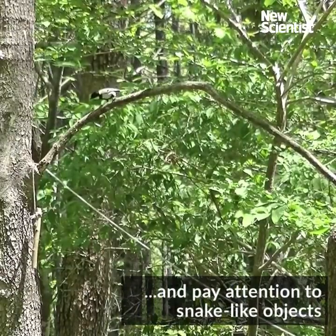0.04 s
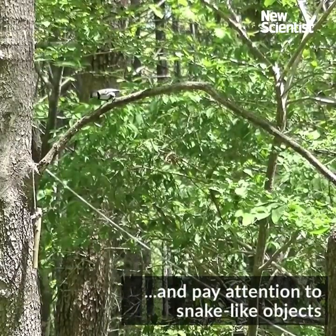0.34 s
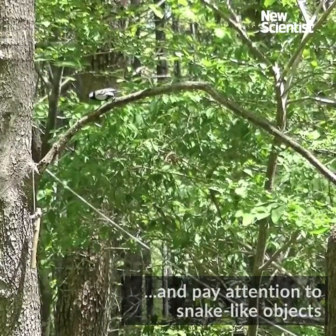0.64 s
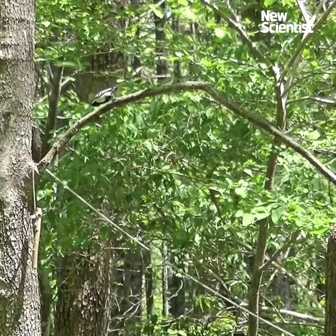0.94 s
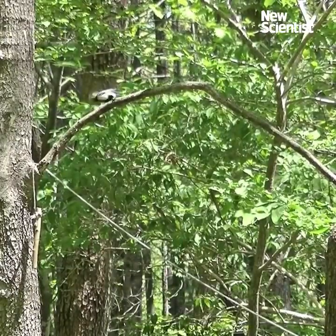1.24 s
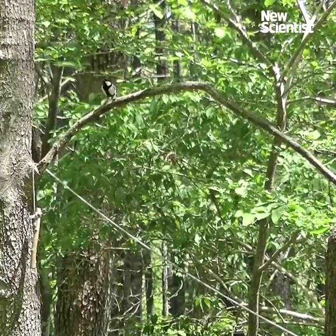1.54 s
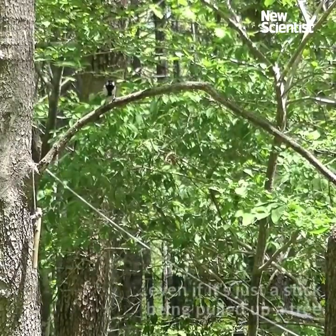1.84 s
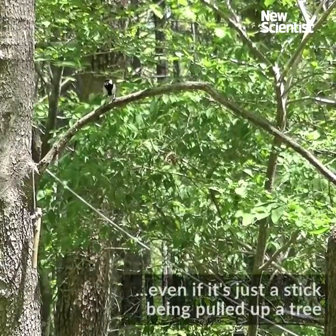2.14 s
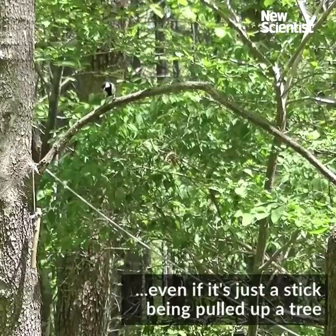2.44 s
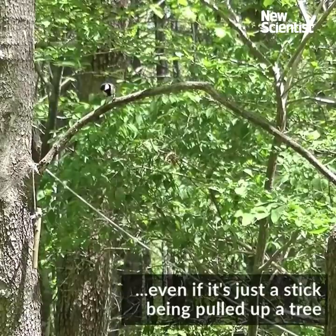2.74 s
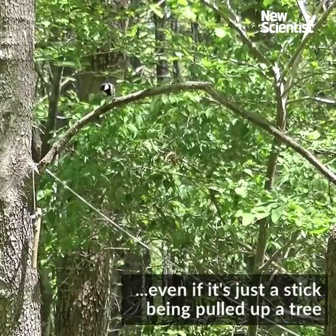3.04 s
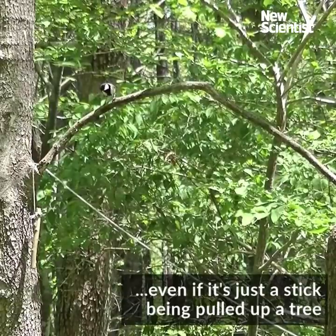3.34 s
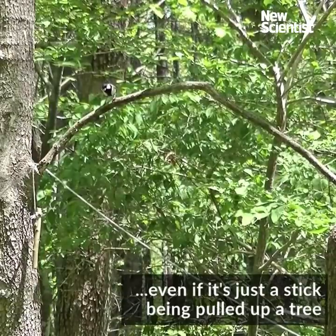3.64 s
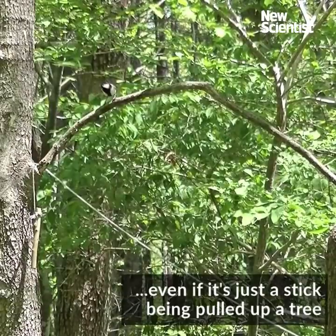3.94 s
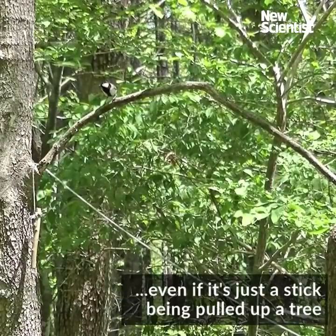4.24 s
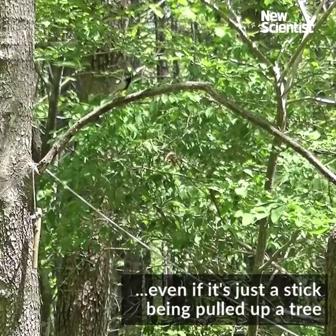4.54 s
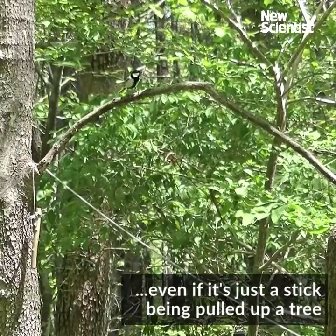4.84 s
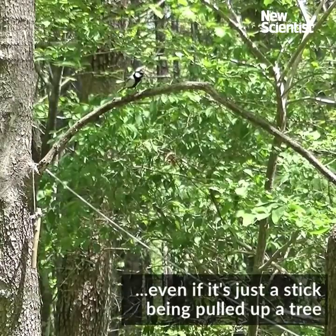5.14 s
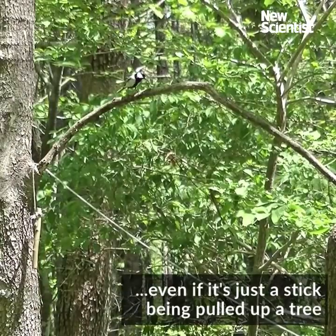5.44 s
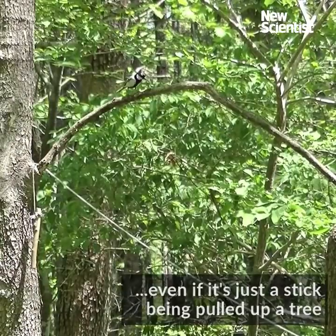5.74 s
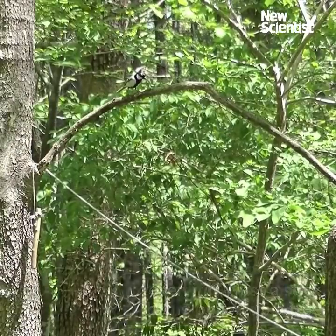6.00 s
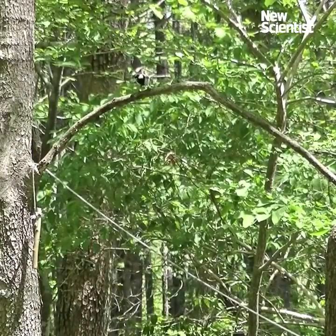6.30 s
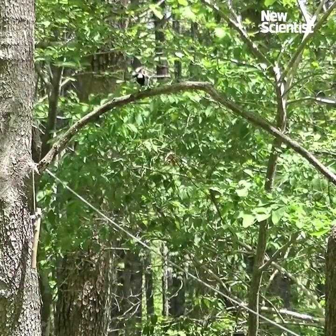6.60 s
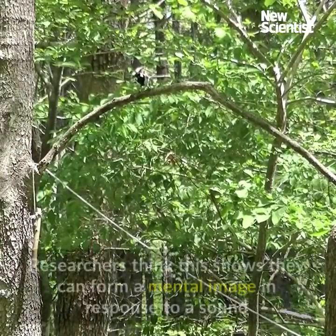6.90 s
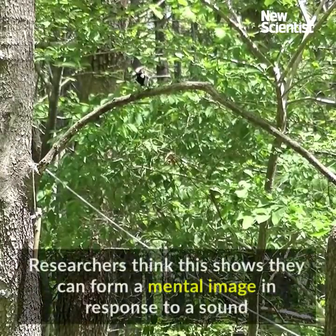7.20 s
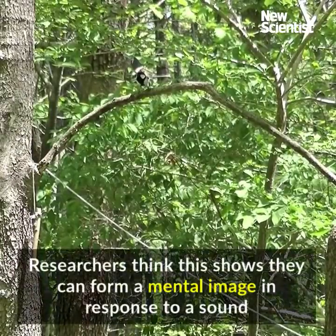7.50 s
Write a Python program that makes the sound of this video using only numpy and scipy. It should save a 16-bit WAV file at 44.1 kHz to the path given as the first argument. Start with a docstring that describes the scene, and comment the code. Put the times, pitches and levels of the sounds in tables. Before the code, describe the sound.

A small bird's harsh, stuttering rasps repeat between two sharp whistled calls, over distant cicadas in a wood.

```python
"""Cicadas drone in the canopy of a summer wood, their ringing drums blurred by distance. A loudspeaker cuts
in with a harsh, stuttering alarm rasp, gated noise that repeats as a loop. A songbird warbles farther off,
and a fly hovers close by, buzzing at the harmonics of its wingbeat, then drifts away. Over them a tit
whistles two sharp three-note calls, gliding tones from its syrinx roughened by random modulation.
Trunks reflect the whistles and the alarm, and leaves scatter them into a short tail."""
import sys
import numpy as np
from scipy import signal
from scipy.fft import rfft, irfft, next_fast_len
from scipy.io import wavfile
from scipy.ndimage import uniform_filter1d, map_coordinates

SR = 44100
rng = np.random.default_rng(int(sys.argv[2]) if len(sys.argv) > 2 else 0)


def store_wav(level_fs):
    """Save 16-bit WAV to argv[1]."""
    pcm = np.round(np.clip(np.atleast_2d(level_fs), -1, 1) * 32767)
    wavfile.write(sys.argv[1], SR, pcm.T.astype(np.int16))


N = 337806
TIME = np.arange(N) / SR

# Levels in the tables are relative: each source applies its own gain.
# noise spectra of the canopy and of the wood's low hush: f/Hz, level/dB
CANOPY_SPECTRUM = [(25, -62), (60, -70), (140, -40.5), (250, -30.5), (450, -20.5), (720, -13.5),
                   (1050, -17), (1450, 1.5), (1850, -4.5), (2500, 5), (4500, -1), (6500, -20),
                   (10000, -17.5), (15500, -27)]
HUSH_SPECTRUM = [(60, -43), (130, -29), (250, -15), (600, -4), (1200, -6), (3000, -45)]
# course of a faint far tone: t/s, f/Hz, level/dB
DRONE_TRACK = [(3.55, 754, -71), (3.75, 754, -64), (4.3, 772, -65), (4.7, 762, -78), (6.9, 754, -95),
               (7.25, 755, -65), (7.66, 760, -69)]
# resonances of the cicada chorus: f/Hz, width/Hz, level/dB
CHORUS_RESONANCES = [(2832, 105, 10.5), (3222, 190, 4.5), (4375, 420, 0), (5820, 760, -4.5),
                     (7330, 850, -10.5), (8850, 680, -17), (10700, 650, -28)]
# envelope of the chorus: t/s, level/dB
CHORUS_ENVELOPE = [(0, -36.5), (1.2, -39), (1.8, -35), (2.4, -36.5), (3.6, -36), (4.3, -36.5), (4.8, -35),
                   (5.9, -32), (7.1, -32), (7.66, -35)]
# three cicadas that stand out, the last soon falling silent: t/s, f/Hz, level/dB
LOW_CICADA_TRACK = [(0.0, 2090, -42.5), (0.49, 2207, -33.5), (1.15, 2151, -49), (1.41, 2243, -40.5),
                    (1.81, 2100, -46), (2.84, 2167, -39), (3.8, 2134, -39.5), (4.31, 2156, -28),
                    (4.57, 2150, -37), (4.63, 2211, -38.5), (6.85, 2130, -51.5), (7.42, 2176, -43),
                    (7.66, 2090, -44)]
HIGH_CICADA_TRACK = [(0.0, 2740, -39), (0.81, 2743, -49), (0.94, 2746, -37.5), (3.65, 2736, -33),
                     (4.46, 2727, -36), (4.63, 2778, -42.5), (5.91, 2815, -41), (7.66, 2819, -41)]
BRIEF_CICADA_TRACK = [(0, 3405, -32), (.55, 3390, -37.5), (.95, 3410, -38), (1.3, 3320, -65)]
# noise spectra of the low cicada's rattle and of the distant churrs: f/Hz, level/dB
RATTLE_SPECTRUM = [(900, -37.5), (1350, -3.5), (1550, 1), (1900, 5), (2500, -3), (3200, -43)]
CHURR_SPECTRUM = [(2800, -39), (3600, -2), (4050, 3), (4600, -5.5), (5400, -23), (9000, -53)]
# the churrs: t/s, duration/s, level/dB
CHURR_BURSTS = [(0.744, 0.09, -27), (0.999, .06, -34), (1.628, 0.12, -38), (2.607, 0.094, -32),
                (4.416, 0.069, -29.5), (4.451, 0.25, -31.5), (6.147, 0.11, -31.5)]
# the songbird's arcs of pitch: t/s, duration/s, first f/Hz, middle f/Hz, last f/Hz, level/dB
SONGBIRD_NOTES = [ (1.007, 0.056, 4000, 4020, 4010, -35.5), (1.994, 0.024, 3850, 3840, 3530, -25.5),
                  (2.095, 0.054, 3470, 3460, 3460, -30.5), (2.183, .03, 5200, 4800, 4740, -26.5),
                  (2.545, 0.03, 3970, 3690, 3325, -31), (2.888, 0.085, 3975, 3996, 4020, -27.5),
                  (3.078, .026, 3894, 3510, 3350, -26), (3.202, 0.045, 2070, 1548, 1760, -34),
                  (3.262, 0.03, 2590, 2190, 2026, -25.5), (3.389, 0.046, 2405, 1950, 1970, -26.5),
                  (3.504, .039, 1942, 2330, 2620, -26), (3.556, 0.016, 3220, 3650, 4000, -22),
                  (3.64, 0.047, 3670, 3850, 3280, -25.5), (3.658, 0.023, 2370, 1984, 1930, -30),
                  (3.682, 0.041, 2096, 1950, 1290, -31.5), (4.429, .05, 4080, 3970, 3940, -30.5)]
# envelope of the fly as it hovers and leaves: t/s, level/dB
FLY_ENVELOPE = [(0, -62), (1.5, -65.5), (2.6, -64.5), (3.0, -68.5), (3.3, -76.5), (3.9, -76.5), (4.4, -100)]
# partials of its wingbeat: harmonic number, level/dB
WING_HARMONICS = [(1, -7), (2, 5.5), (3, 0.5), (4, -1), (5, -2.5), (6, -1)]
# its darts: t/s, shift in f/Hz, rise in level/dB
FLY_DARTS = [(.22, 8, 5), (.37, 12, 8), (1.0, 10, 5), (1.39, 8.5, 5), (1.56, 8.5, 4), (1.95, 2.5, 7),
             (2.08, 7.5, 5), (2.21, 13.5, 2.5), (2.6, -1, 5), (2.84, 8, 2), (3.41, 9.5, 14), (3.58, 7.5, 7),
             (3.8, 6.5, 8.5)]
# syllables, timed from the alarm's onset: t/s, duration/s, level/dB
ALARM_SYLLABLES = [(0, .046, -28), (.06, .048, -27), (.118, .048, -27.5), (.178, .05, -28.5),
                   (.238, .054, -26.5), (0.307, .05, -25.5), (.362, .064, -24), (.436, 0.057, -24),
                   (0.509, 0.069, -25), (.6, .085, -30)]
# envelope of the hiss beneath them, timed likewise: t/s, level/dB
HISS_ENVELOPE = [(-.16, -48.5), (-.08, -34), (0, -32), (.3, -30), (.66, -30), (.72, -37), (.8, -91.5)]
# noise spectra of the alarm's rasp and hiss: f/Hz, level/dB
RASP_SPECTRUM = [(1200, -41), (2200, -69), (3400, 0), (4400, 0.5), (5000, -8), (5900, -5.5), (7100, -5.5),
                 (8500, -14.5), (10500, -13), (10850, -13.5), (11800, -11.5), (12300, -22), (15500, -30)]
HISS_SPECTRUM = [(900, -45), (1500, -11.5), (2100, 1.5), (3500, -3), (5000, -5), (7000, -10),
                 (10000, -17.5), (11300, -18.5), (12500, -24), (15500, -37)]
# resonances that ring in the alarm: f/Hz, width/Hz, peak level/dB
ALARM_RESONANCES = [(3600, 300, 2), (4370, 150, 2), (6020, 160, 3.5), (6420, 100, 3), (6800, 150, 4.5),
                    (7320, 180, 3.5), (10900, 230, 8), (11420, 220, 7), (13300, 400, 4)]
# the tit's note shapes, timed from each onset: t/s, f/Hz, level/dB, roughness (0 to 1)
WHISTLE_SHAPE = [(0, 4690, -10, 0.54), (.006, 6800, -1.5, 0.3), (.012, 8020, -14, .1),
                 (.03, 8280, -12, 0.2), (.058, 8350, -7, .08), (.081, 8250, -5.5, 0.05),
                 (.093, 7300, -13, .25)]
CHIP_SHAPE = [(0, 4620, -27, 1), (.012, 5300, -11.5, 1), (.022, 5790, -4.5, 0.85), (.026, 5760, -10, 0.53),
              (.034, 6500, -5, .28), (.039, 6550, 2, 0.49), (.045, 6240, -8, 0.98)]
SLIDE_SHAPE = [(0, 4800, -22, 0.86), (.007, 5270, -16, 0.76), (.011, 5780, -10.5, 0.57),
               (.015, 5260, -4.5, 0.6), (.022, 4800, -13, 0.5), (.033, 4740, -13, 0.25),
               (.038, 4690, -5, 0.19), (.053, 4500, 0.5, 0.056), (.067, 4250, -3.5, .2),
               (.083, 3910, -10.5, .2), (.092, 3750, -11, 0.24)]
REBOUND_SHAPE = [(0, 3780, -6, 0.62), (.011, 4740, -8, 0.15), (.018, 4434, 0, .08),
                 (.03, 4165, -3.5, 0.092), (.042, 4090, -5, .08), (.056, 4170, -13, .05)]
# onsets of each shape: t/s, level/dB
WHISTLE_ONSETS = [(1.905, -17), (6.324, -16.5)]
CHIP_ONSETS = [(2.064, -10.5), (6.485, -10.5)]
SLIDE_ONSETS = [(2.216, -7.5), (6.636, -8.5)]
REBOUND_ONSETS = [(2.308, -14), (6.728, -14.5)]
# spectrum of the air noise in the tit's voice: f/Hz, level/dB
AIR_SPECTRUM = [(2500, -26), (4500, -13), (5900, -7), (6700, -19), (7600, -13), (8700, -25),
                (9500, -16.5), (11200, -22), (12700, -17), (13800, -24), (15500, -35)]
# reflections from trunks: delay t/s, level/dB
TRUNK_ECHOES = [(.0065, -20), (.0125, -17), (.021, -22), (.034, -23)]
# narrow dips in the overall frequency response: f/Hz, width/Hz
RESPONSE_NOTCHES = [(1000, 86), (3010, 340)]


def amp(db):
    """Amplitude ratio of a level in decibels."""
    return 10 ** (np.asarray(db) / 20)


def unit(x):
    """Normalisation to rms 1."""
    return x / np.sqrt(np.mean(x ** 2) + 1e-20)


def curves(rows, t=TIME):
    """Linear interpolation in time of each column after the first."""
    times, *columns = np.transpose(rows)
    return [np.interp(t, times, column) for column in columns]


def wobble(rate, t=TIME):
    """Smooth random modulation: a spline through rate knots a second."""
    position = (t - t[0]) * rate
    return map_coordinates(rng.standard_normal(int(position[-1]) + 4), [position])


def filtered(x, response):
    """Linear filtering: the spectrum of x times a frequency response."""
    size = next_fast_len(N + 8192)
    return irfft(rfft(x, size) * response(np.fft.rfftfreq(size, 1 / SR)), size)[..., :N]


def coloured(spectrum):
    """Spectral shaping of white noise to rms 1, with a steep roll-off below the first point."""
    f, db = np.transpose(spectrum)
    response = lambda hz: amp(np.interp(np.log(hz + 1), np.log(f), db)) * np.minimum(hz / f[0], 1) ** 2
    return unit(filtered(rng.standard_normal(N), response))


def patchy(x, depth_db):
    """Random gain over time and frequency makes narrow spectral peaks come and go."""
    spectra = signal.stft(x, nperseg=512)[2]
    field = uniform_filter1d(rng.standard_normal(spectra.shape), size=3, axis=0)
    field = uniform_filter1d(field, size=11, axis=1)
    return unit(signal.istft(spectra * amp(depth_db * unit(field)), nperseg=512)[1][:N])


def phase_of(hz):
    """Phase as the time integral of frequency."""
    return 2 * np.pi * np.cumsum(hz) / SR


def gate(t, start, length, edge):
    """A time window with raised-cosine edges."""
    return np.sin(np.pi / 2 * np.clip(np.minimum(t - start, start + length - t) / edge, 0, 1)) ** 2


def span(start, length):
    """The samples that a note covers."""
    return slice(int(start * SR), int((start + length) * SR))


def wood(x, scatter_db, t60, leaves_hz=5500):
    """Reflection from trunks gives discrete echoes; scattering by leaves gives a duller, decaying tail."""
    t = TIME[:SR // 2]
    tail = rng.standard_normal(len(t)) * amp(-60 * t / t60) * (1 - np.exp(-t / .016))
    tail = signal.lfilter(*signal.butter(2, leaves_hz, fs=SR), tail / np.linalg.norm(tail))
    response = amp(scatter_db) * tail
    response[0] += 1  # direct path
    for delay, db in TRUNK_ECHOES:
        response[int(delay * SR)] += amp(db)
    return signal.fftconvolve(x, response)[:N]


def canopy(level_db=-35):
    """Leaves and far insects add incoherently to an even broadband hush."""
    return amp(level_db + .057 * wobble(2.8)) * coloured(CANOPY_SPECTRUM)


def drone():
    """A faint far tone, unsteady through slight amplitude and frequency modulation."""
    hz, db = curves(DRONE_TRACK)
    return amp(db + 2.2 * wobble(7.4)) * np.sqrt(2) * np.sin(phase_of(hz + 3 * wobble(11)))


def chorus(shimmer_db=.77):
    """By superposition, many far cicadas merge into noise in a ladder of resonances."""
    resonances = lambda hz: sum(amp(db) / (1 + 2 * ((hz - centre) / width) ** 2) ** 1.77
                                for centre, width, db in CHORUS_RESONANCES)
    envelope = amp(curves(CHORUS_ENVELOPE)[0] + shimmer_db * wobble(13))
    return envelope * unit(filtered(rng.standard_normal(N), resonances))


def cicada_rattle(level_db=-8):
    """The low cicada's dry rattle: a noise band that follows the envelope of its song."""
    return amp(curves(LOW_CICADA_TRACK)[1] + level_db) * coloured(RATTLE_SPECTRUM)


def cicada(track, level_db, octave_db, width_hz=80, skirt_hz=500, skirt_db=-7):
    """A resonating drum and its octave, blurred by distance: random modulation broadens both lines."""
    hz, db = curves(track)
    fundamental = np.exp(1j * phase_of(hz))
    partials = fundamental + amp(octave_db) * fundamental ** 2
    blur = lambda: wobble(width_hz) + amp(skirt_db) * wobble(skirt_hz)
    return amp(db + level_db) * unit(np.real((blur() + 1j * blur()) * partials))


def churrs():
    """Bursts of narrow-band noise, heard as brief rasps deeper in the wood."""
    envelope = sum(amp(db) * gate(TIME, start, length, edge=.026) for start, length, db in CHURR_BURSTS)
    return envelope * coloured(CHURR_SPECTRUM)


def songbird(level_db=-1, taper_db=5):
    """Frequency modulation: pure whistles glide along parabolas, each loudest at its middle."""
    out = np.zeros(N)
    for start, length, first, middle, last, db in SONGBIRD_NOTES:
        at = span(start, length)
        u = np.linspace(-1, 1, at.stop - at.start)  # position within the note
        hz = middle + (last - first) / 2 * u + ((first + last) / 2 - middle) * u ** 2
        envelope = amp(db + level_db - taper_db * u ** 2) * gate(TIME[at], start, length, edge=.003)
        out[at] += envelope * np.sqrt(2) * np.sin(phase_of(hz))
    return out


def fly(wingbeat_hz=213.1, dart_s=.035, level_db=-1, waver=.012, flicker_db=3):
    """Periodic wingbeats radiate a wavering harmonic series; darts bend its pitch and raise its level."""
    darts = [(np.exp(-((TIME - when) / dart_s) ** 2), shift_hz, rise_db)
             for when, shift_hz, rise_db in FLY_DARTS]
    hz = wingbeat_hz + sum(push * shift_hz for push, shift_hz, _ in darts)
    db = curves(FLY_ENVELOPE)[0] + sum(push * rise_db for push, _, rise_db in darts)
    db += flicker_db * wobble(20)
    phase = phase_of(hz * (1 + waver * wobble(30)))
    buzz = sum(amp(level + 2.8 * wobble(18)) * np.sin(k * phase) for k, level in WING_HARMONICS)
    return amp(db + level_db) * np.sqrt(2) * buzz


def alarm(onset_s=.26, period_s=2.3938, grain_db=.6, rasp_db=-2.3, hiss_db=-2):
    """A loudspeaker loops amplitude-modulated noise: ten grainy syllables swell over a softer hiss."""
    t = TIME - onset_s
    syllables = sum(amp(db) * gate(t, delay, length, edge=.012) for delay, length, db in ALARM_SYLLABLES)
    grain = unit(amp(grain_db * wobble(550)))
    rasp = amp(rasp_db) * syllables * grain * patchy(coloured(RASP_SPECTRUM), depth_db=3.5)
    hiss = amp(hiss_db + curves(HISS_ENVELOPE, t)[0]) * coloured(HISS_SPECTRUM)
    phrase = gate(t, start=-.2, length=1, edge=.13) * (rasp + hiss)
    loop = np.resize(phrase[:int(period_s * SR)], N)
    ring = lambda hz: amp(sum(db / (1 + (2 * (hz - centre) / width) ** 2)
                              for centre, width, db in ALARM_RESONANCES))
    # interference with the reflection from a surface near the loudspeaker ripples the spectrum
    bounce_s, bounce_db = .001176, -16
    comb = lambda hz: 1 + amp(bounce_db) * np.exp(-2j * np.pi * hz * bounce_s)
    return filtered(loop, lambda hz: ring(hz) * comb(hz))


def undertone(pitch_hz=6700, blur_hz=800, under_db=-11):
    """A second voice swells below each high whistle, its line broadened by random modulation."""
    envelope = sum(amp(db + under_db) * gate(TIME, start + .011, length=.086, edge=.04)
                   for start, db in WHISTLE_ONSETS)
    phase = 2 * np.pi * pitch_hz * TIME
    return envelope * unit(wobble(blur_hz) * np.sin(phase) + wobble(blur_hz) * np.cos(phase))


def syrinx(shape, onsets, jitter_hz=480, flutter_db=1.5,
           second_db=-39, third_db=-43, air_db=-22, rasp_db=-14):
    """A nearly sinusoidal oscillation; roughness shakes pitch and level and adds overtones and noise."""
    out = np.zeros(N)
    air = coloured(AIR_SPECTRUM)
    length = shape[-1][0]
    for start, level_db in onsets:
        at = span(start, length)
        t = TIME[at] - start
        hz, db, rough = curves(shape, t)
        waver = .004 * wobble(200, t)
        phase = phase_of(hz * (1 + waver) + jitter_hz * rough * wobble(1463, t))
        overtones = amp(second_db) * np.sin(2 * phase)
        overtones += amp(third_db) * np.sin(3 * phase) * (3 * hz < SR / 2)
        flutter = amp(flutter_db * rough * wobble(667, t))
        voice = np.sqrt(2) * (np.sin(phase) + (1 + 4 * rough) * overtones) * flutter
        # the highest whistles are the airiest
        noise = air[at] * (amp(rasp_db) * rough + amp(air_db) * (hz / 6000) ** 4)
        out[at] += amp(level_db + db) * (voice + noise) * gate(t, 0, length, edge=.004)
    return out


def tit():
    """Each call is a run of glides: a thin high whistle, a rough rising chip, a loud fall that rebounds."""
    whistle = syrinx(WHISTLE_SHAPE, WHISTLE_ONSETS) + undertone()
    chip = syrinx(CHIP_SHAPE, CHIP_ONSETS)
    slide = syrinx(SLIDE_SHAPE, SLIDE_ONSETS) + syrinx(REBOUND_SHAPE, REBOUND_ONSETS)
    return whistle + chip + slide


def scene(width_db=-17, lateral_delay_s=.011, songbird_left_db=2):
    """Mid-side superposition: sources near the centre, the songbird a little left, diffuse sound wider."""
    calls = wood(tit(), scatter_db=-11, t60=.4, leaves_hz=7000)
    loudspeaker = wood(alarm(), scatter_db=-6, t60=.18, leaves_hz=14000)
    warble = wood(songbird(), scatter_db=-6.5, t60=.38)
    far_rasps = churrs()
    cicadas = chorus() + cicada_rattle()
    cicadas += cicada(LOW_CICADA_TRACK, level_db=2, octave_db=-16)
    cicadas += cicada(HIGH_CICADA_TRACK, level_db=1.5, octave_db=-16.5)
    cicadas += cicada(BRIEF_CICADA_TRACK, level_db=1.5, octave_db=-21)
    buzz = fly()
    mid = drone() + canopy() + cicadas + far_rasps + buzz + loudspeaker + calls
    # lateral reflections arrive late and widen the image
    lateral = amp(width_db) * cicadas + amp(-17) * buzz + amp(-23.5) * calls
    side = filtered(lateral, lambda hz: np.exp(-2j * np.pi * hz * lateral_delay_s))
    side += amp(-23) * canopy() + amp(-68.5) * coloured(HUSH_SPECTRUM)  # hush from all around
    stereo = np.array([mid + side, mid - side]) * amp([[.2], [-.2]])
    return stereo + warble * amp([[songbird_left_db], [-songbird_left_db]])


def record(dry, notch_depth=.95, top_hz=15760):
    """Filtering by two narrow Gaussian notches and a steep band limit."""
    dips = lambda hz: np.prod([1 - notch_depth * np.exp(-(2 * (hz - centre) / width) ** 2)
                               for centre, width in RESPONSE_NOTCHES], axis=0)
    return filtered(dry, lambda hz: dips(hz) * (hz < top_hz))


dry = scene()
out = record(dry)
store_wav(out)
```